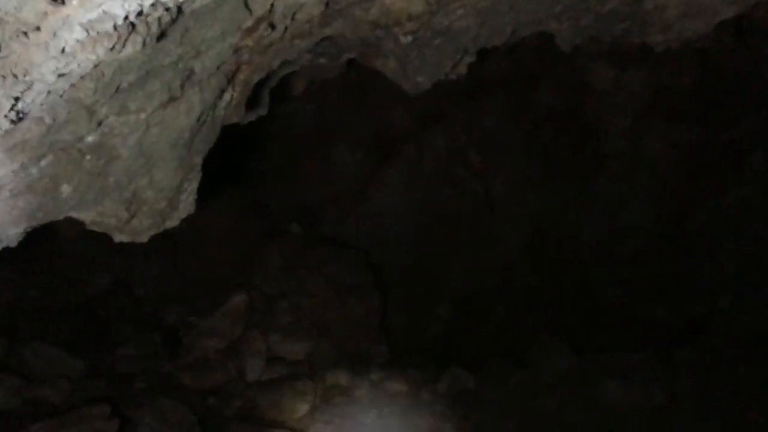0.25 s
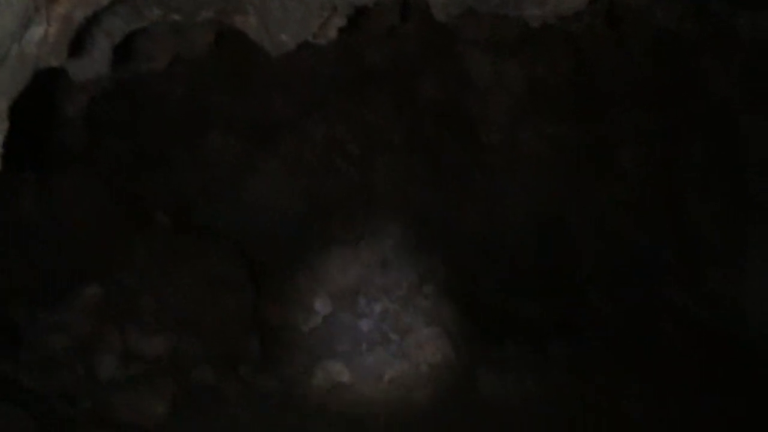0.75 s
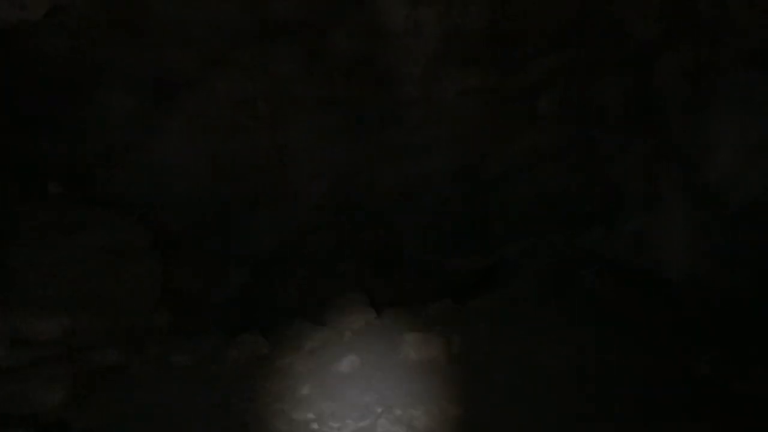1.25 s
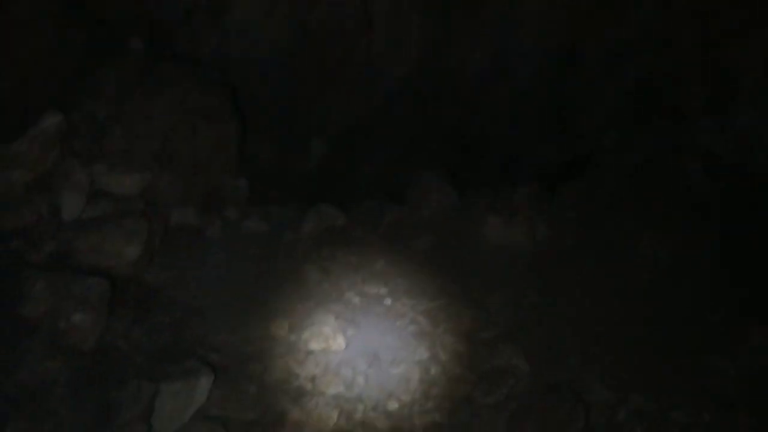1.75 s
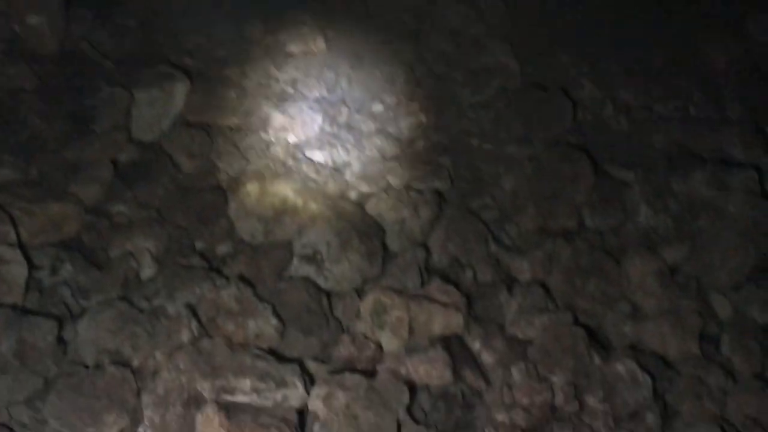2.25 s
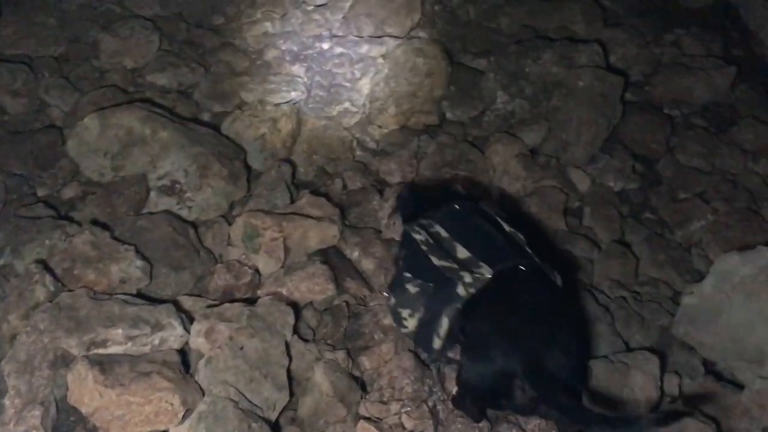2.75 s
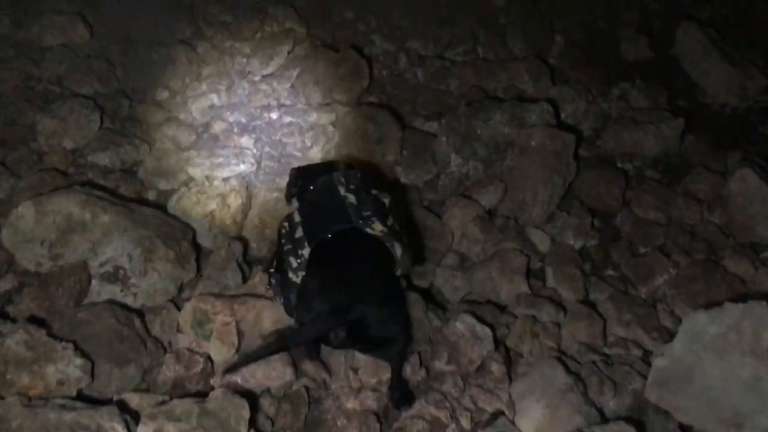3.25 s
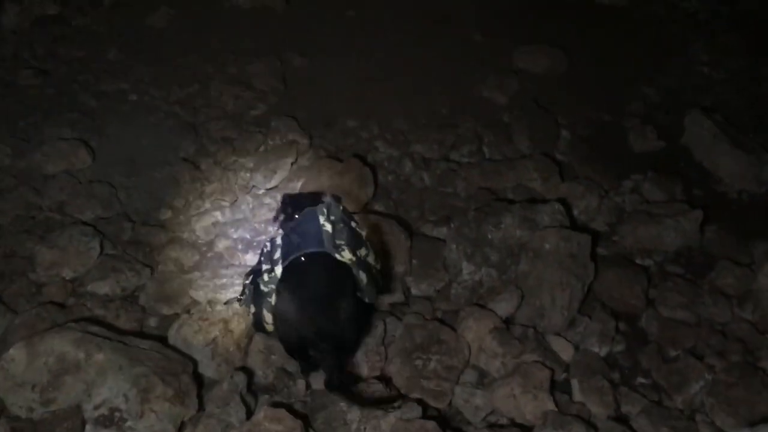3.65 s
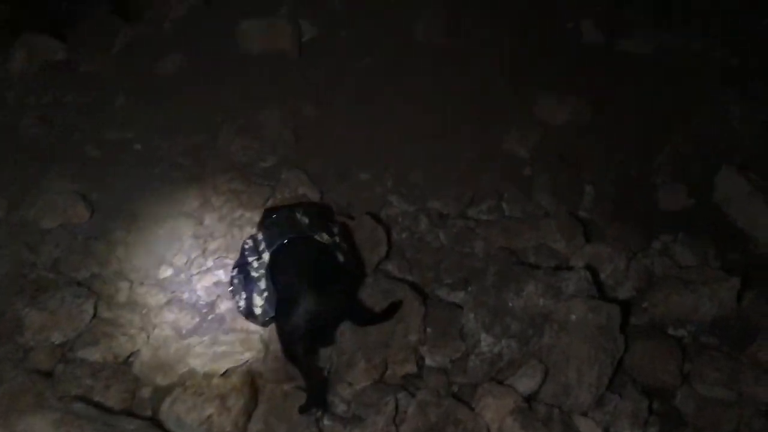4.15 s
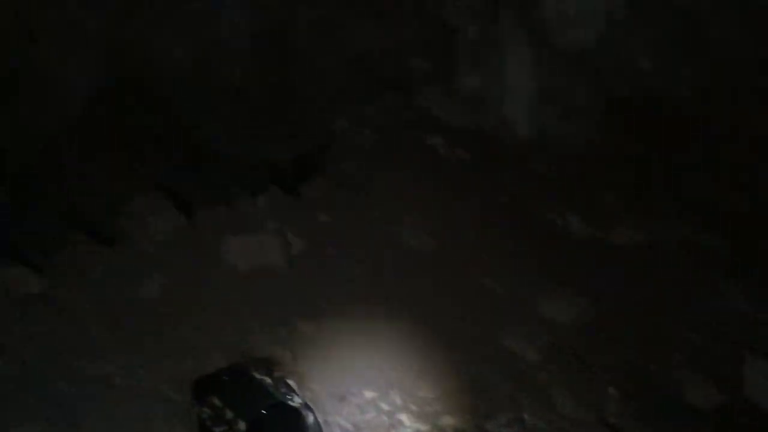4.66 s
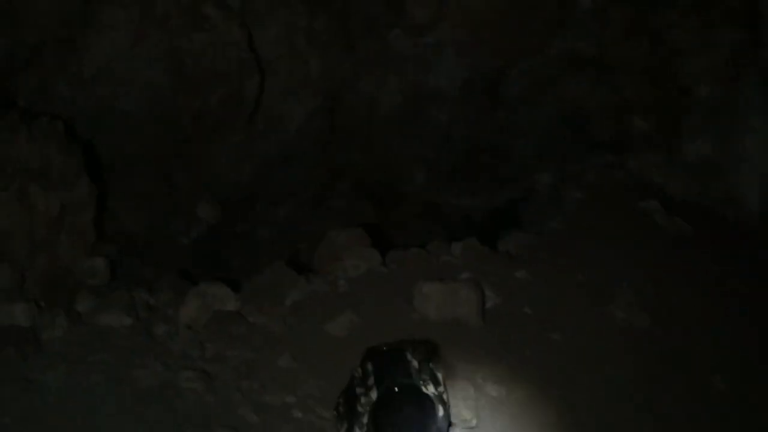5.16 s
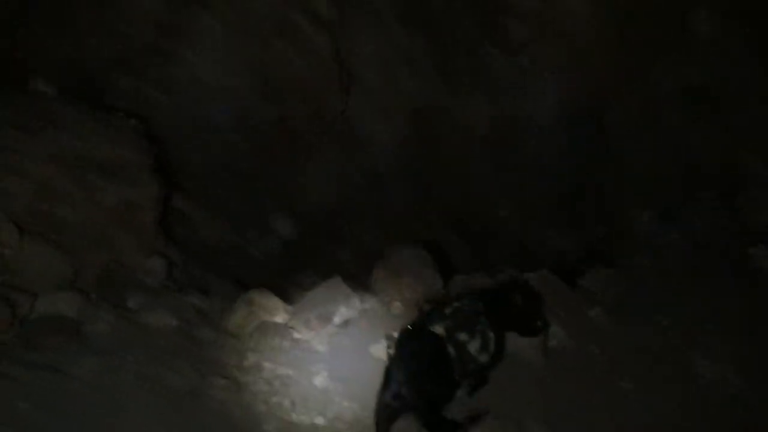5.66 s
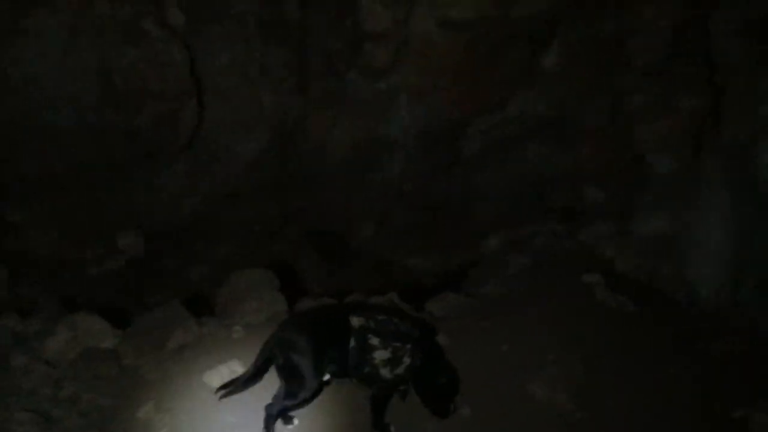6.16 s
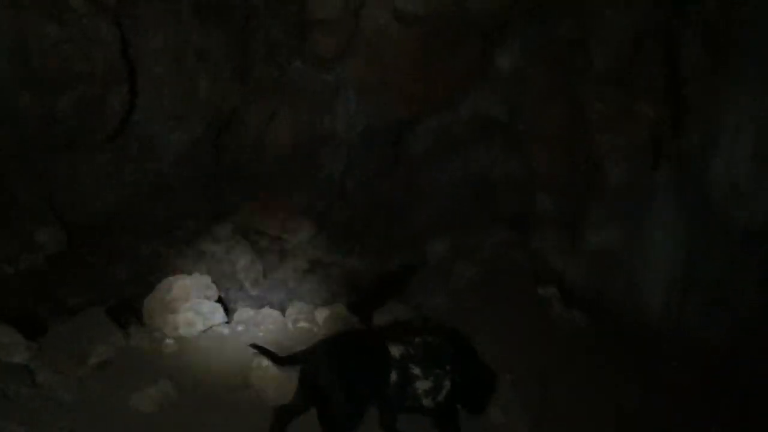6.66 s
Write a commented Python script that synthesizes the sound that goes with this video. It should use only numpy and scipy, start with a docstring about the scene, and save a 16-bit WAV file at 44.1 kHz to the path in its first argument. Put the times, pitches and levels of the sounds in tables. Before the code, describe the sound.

In a small rock-walled cave, faint clicks and knocks give way to pebbles clicking over grinding soles. A flat slab lands and rocks, then bright stone clicks crowd together sharply. A hard press grinds loudly, after which the steps thin to scattered clicks with a few clusters. Short dense echo, low rumble and steady microphone hiss surround the close sounds.

```python
"""Boots and a dog's paws cross loose rubble in a small cave.
0-1 s: faint clicks and knocks. 1-2 s: pebbles click over grinding soles. 2-2.9 s: dense bright clicks; a slab lands.
3.1-3.3 s: a hard press grinds loudly. Then sparser clicks, with clusters near 5.4 and 6.1 s.
Stones are struck modes, presses are grainy noise; here and there brief thin high tones, as fading sines.
Throughout: short dense wall echo as decaying noise, low rumble and microphone hiss as banded noise."""
import sys
import numpy as np
from scipy import signal
from scipy.io import wavfile

SR = 44100
rng = np.random.default_rng(int(sys.argv[2]) if len(sys.argv) > 2 else 0)


def file_out(sig):
    """Save sig as 16-bit WAV at sys.argv[1]."""
    # one column per channel
    cols = np.atleast_2d(sig).T
    # limit, then scale
    lim = np.clip(cols, -1, 1)
    pcm = np.round(lim * 32767).astype(np.int16)
    wavfile.write(sys.argv[1], SR, pcm)


N = 304731


def amp(db):
    """dB to amplitude."""
    return 10 ** (np.asarray(db) / 20)


def rms_one(x):
    """Scale to rms 1."""
    return x / np.sqrt(np.mean(x ** 2) + 1e-20)


def at_hz(points, hz):
    """Read a frequency table, linear in log f."""
    f_hz, value = np.array(points).T
    return np.interp(np.log(hz), np.log(f_hz), value)


def add(out, s, sound):
    """Mix a sound in at time s, cut at the end."""
    at = round(s * SR)
    out[at:at + len(sound)] += sound[:N - at]


def resonance(x, hz, width_hz):
    """Two-pole resonance, gain 1 on top; centre held to 17 kHz."""
    r = np.exp(-np.pi * width_hz / SR)
    w = 2 * np.pi * min(hz, 17000) / SR
    return signal.lfilter(np.array([1, 0, -1]) * (1 - r * r) / 2, [1, -2 * r * np.cos(w), r * r], x)


def rattle(length_ms, samples, per_s):
    """A first contact, then a dying cluster of chance ones; long rattles start softer, as a scuff."""
    happens, force = rng.random((2, samples))
    ms = 1000 * np.arange(samples) / SR
    touches = (happens < per_s / SR) * (2 * force - 1) * np.exp(-ms / max(length_ms, .2))
    touches[0] = 0.61 * np.exp(-length_ms / 8.9)
    return touches + 1e-12


# modes of an uneven stone, before chance: place [breadths from centre], level/dB
MODES = [(-1.73, -5), (-1.43, -2), (-0.86, 4.5), (-0.32, 11.5), (0.28, 6.5), (0.71, 3.5), (0.87, 1),
         (0.79, -6), (1.6, -34)]


def strikes(rows):
    """Each rattle rings the short modes of a stone, spread about its centre, each a little off by chance."""
    out = np.zeros(N)
    for s, peak_db, hz, breadth_octaves, length_ms in rows:
        touches = rattle(length_ms, 4500, per_s=2500)
        ring = 0
        for place, mode_db in MODES:
            place_luck, level_luck = rng.normal(size=2)
            mode_hz = hz * 2 ** (breadth_octaves * (place + 0.16 * place_luck))
            mode = resonance(touches, mode_hz, mode_hz / 4.3)
            # low modes have narrower bands: more drive for the same energy
            ring = ring + amp(mode_db + 2.2 * level_luck) * np.sqrt(hz / mode_hz) * mode
        # contact time dulls everything above the top modes
        top_hz = min(hz * 2 ** (1.85 * breadth_octaves), 18000)
        ring = signal.sosfilt(signal.butter(2, top_hz, fs=SR, output="sos"), ring)
        add(out, s, amp(peak_db) * ring / np.max(np.abs(ring)))
    return out


PEBBLE_OVER_GRIT_DB, PEBBLE_SPREAD_DB = 15.5, 3
PEBBLE_HZ, PEBBLE_SPREAD_OCTAVES, PEBBLE_MS = 4080, 1, 3.1   # medians and pitch spread


def pebbles(grit_db, count):
    """Small stones kicked loose: strikes at random, thicker and louder where the grit is loud."""
    share = np.cumsum(np.sqrt(amp(grit_db)))
    at = np.searchsorted(share / share[-1], rng.random(count))
    rows = []
    for i, (level, pitch, length) in zip(at, rng.normal(size=(count, 3))):
        peak_db = grit_db[i] + PEBBLE_OVER_GRIT_DB + PEBBLE_SPREAD_DB * level
        hz = PEBBLE_HZ * 2 ** (PEBBLE_SPREAD_OCTAVES * np.clip(pitch, -2, 2))
        rows.append((i / SR, peak_db, hz, PEBBLE_MS * 2 ** length))
    return rows


# weight dropping onto packed rock: t/s, peak level/dB, rattle length/ms
THUMPS = [(.815, -29, 17), (1.141, -45, 20), (1.39, -35.5, 15), (1.416, -43, 22), (2.106, -14, 4.4),
          (2.552, -29.5, 36), (3.255, -25, 16), (3.299, -30, 22), (3.368, -27, 16), (3.677, -32, 11),
          (3.81, -34.5, 11), (3.944, -29.5, 15), (5.219, -41, 5), (5.261, -39, 13), (5.395, -24.5, 28),
          (5.424, -25.5, 12), (6.135, -31.5, 9.2), (6.19, -35, 11), (6.315, -25.5, 14), (6.698, -38.5, 14)]
THUMP_HZ, THUMP_OCTAVES = 199, 0.49


def thumps():
    """Weight drops onto packed rock: strikes on low modes of fixed centre and breadth."""
    return [(s, db, THUMP_HZ, THUMP_OCTAVES, ms) for s, db, ms in THUMPS]


# stone on stone, pebbles high, big rocks low: t/s, peak level/dB, centre f/Hz, rattle length/ms
STRIKES = [(0.077, -38, 3000, 2.3), (0.233, -40.5, 1060, 11), (0.2428, -29, 8800, .7),
           (.794, -37.5, 804, 7.5), (.815, -27, 650, 4.9), (.816, -34.5, 3800, 18), (1.0313, -36, 1100, 23),
           (1.1398, -13.5, 2670, 1.44), (1.1456, -21, 2910, 4.1), (1.1613, -24, 3660, 3.8),
           (1.2132, -24.5, 3850, 3), (1.3888, -28.5, 3640, 2.9), (1.4075, -28.5, 764, 9.5),
           (1.4821, -26, 7090, 2.3), (1.549, -24, 6430, 1.5), (1.5549, -16, 3870, 0.51),
           (1.557, -21, 4040, 14), (1.5683, -16, 3320, 0.9), (1.7236, -33, 5010, 2.6),
           (1.7728, -29, 11090, 3.7), (1.7796, -28, 5400, 29), (1.8506, -26, 2980, 3.2),
           (1.892, -21.5, 5460, 0.88), (1.8921, -32.5, 1340, 18), (1.9162, -27.5, 1690, 5.3),
           (1.9998, -25, 2250, 12), (1.999, -20.5, 6000, 1.7), (2.0526, -29, 5850, 2.3),
           (2.0664, -19.5, 8700, 4.8), (2.077, -14, 13390, 3.2), (2.1084, -26, 2500, 4.9),
           (2.1127, -18.5, 6700, 4.2), (2.1621, -17, 1250, 5), (2.197, -19.5, 3760, 3.2),
           (2.2275, -17.5, 7260, 2.2), (2.2504, -25, 4870, 1.7), (2.2908, -29, 1300, 9.5),
           (2.3362, -24, 1180, 3.8), (2.341, -19.5, 4580, 11), (2.3595, -10, 7500, 0.67),
           (2.38, -14, 6560, 3), (2.4046, -22.5, 2200, 1), (2.407, -10.5, 9720, 2.7),
           (2.414, -10, 7600, 3.3), (2.4174, -5.5, 6570, 2.5), (2.437, -9.5, 8300, .5),
           (2.453, -27, 4420, 3.6), (2.4689, -36, 700, 10.6), (2.4913, -15.5, 7000, 0.46),
           (2.542, -2.5, 5900, 2), (2.552, -27, 556, 8.8), (2.552, -5.5, 1350, 2.7),
           (2.5547, -25, 2520, 4.2), (2.573, -18.5, 1460, 17), (2.5953, -19, 3520, 1.6),
           (2.6645, -22.5, 4160, 5.5), (2.7043, -10, 9320, 0.57), (2.7145, -23, 1910, 1.8),
           (2.7409, 3.5, 6460, 0.64), (2.773, -24, 8060, 1), (2.787, -14.5, 3840, 0.89),
           (2.7926, -17.5, 8240, .8), (2.8108, -23, 5910, .5), (2.8283, -6.5, 7300, 0.65),
           (2.8407, -11, 4860, 2), (2.8507, -15, 5240, 0.69), (2.856, -19, 11000, .6),
           (2.89, -29, 1430, 20), (2.906, -20.5, 3730, 1), (2.9435, -6.5, 10700, 0.34),
           (3.0157, -22.5, 6160, 23), (3.098, -20, 6700, 9.6), (3.1385, -33.5, 1410, 20),
           (3.1639, -22.5, 1030, 13), (3.1937, -25, 7260, 0.77), (3.228, -12, 7900, 8),
           (3.2527, -12.5, 6140, 5.9), (3.253, -13, 1000, 8.2), (3.2637, -10.5, 1010, 4.5),
           (3.285, -23, 690, 39), (3.2956, -29, 4740, 10.3), (3.32, -24, 600, 18), (3.327, -26, 3300, 13),
           (3.357, -29, 4650, 3.8), (3.3674, -15.5, 3760, 1.4), (3.3673, -24, 1060, 19),
           (3.4712, -32.5, 870, 29), (3.5438, -29, 5430, 2.6), (3.5832, -27, 7600, 8),
           (3.6766, -36, 855, 15), (3.68, -18, 3650, 0.37), (3.7228, -20.5, 5530, 28),
           (3.7465, -31.5, 2240, 14), (3.8105, -40, 700, 4.4), (3.938, -24.5, 4700, 2.8),
           (3.9487, -26, 4230, 11), (3.95, -31, 403, 14), (3.9553, -27.5, 1140, 8.1),
           (4.1847, -35, 2500, 3), (4.2014, -34, 8430, 1.6), (4.226, -30.5, 3010, 4),
           (4.25, -36.5, 2200, 8), (4.324, -26.5, 5970, 0.51), (4.512, -35.5, 1500, 3.3),
           (4.529, -30.5, 3400, 1.3), (4.6365, -29, 5130, 12), (4.653, -37.5, 500, 6.9),
           (4.701, -39, 1420, 4), (4.739, -35.5, 10160, 4.1), (4.859, -35.5, 1040, 5.3),
           (4.9002, -28, 2040, 1.8), (4.958, -26.5, 8100, 2.9), (5.0377, -34.5, 4190, 4.9),
           (5.1206, -26.5, 1640, 2), (5.125, -33.5, 1500, 22), (5.2602, -35, 6330, 2.7),
           (5.2922, -5.5, 7900, 1.5), (5.391, -25, 8500, 2.9), (5.393, -21.5, 1190, 12),
           (5.3957, -16.5, 3040, 12), (5.405, -12, 2030, 7.5), (5.413, -12.5, 3040, 6.1),
           (5.42, -11.5, 2270, 12), (5.4246, -9, 3060, 11), (5.44, -32, 1530, 13), (5.513, -25, 3520, 4.5),
           (5.5235, -22.5, 5160, 3.9), (5.5383, -16, 7800, 4.7), (5.673, -28.5, 3780, 1.3),
           (5.7102, -31, 3410, 1), (5.7377, -30, 5100, 1.7), (5.8336, -36, 5270, 6.5),
           (5.9585, -33, 2830, 3), (5.9856, -29, 2830, 0.74), (6.1285, -18, 3620, 25),
           (6.1335, -10.5, 3220, 4.2), (6.139, -32.5, 350, 6.6), (6.151, -32, 3000, 14),
           (6.2066, -29.5, 1200, 16), (6.2127, -26.5, 4210, 2), (6.3121, -19.5, 2780, 1.5),
           (6.3145, -21, 754, 12), (6.3215, -23, 1190, 3), (6.354, -30, 4530, .9), (6.3798, -29.5, 730, 36),
           (6.4146, -21.5, 990, 1.4), (6.511, -35, 7000, 1.1), (6.536, -34.5, 725, 18)]
BREADTH_OCTAVES, BREADTH_OCTAVES_PER_DECADE = 0.54, 0.14   # at 1 ms and 2700 Hz; per decade of length
NARROWER_OCTAVES_PER_OCTAVE = 0.078   # higher stones have their modes closer together


def stones(grit_db):
    """Strikes and loose pebbles, broader for long rattles and low stones, and the low thumps."""
    rows = []
    for s, db, hz, ms in STRIKES + pebbles(grit_db, count=55):
        breadth = BREADTH_OCTAVES + BREADTH_OCTAVES_PER_DECADE * np.log10(ms)
        breadth -= NARROWER_OCTAVES_PER_OCTAVE * np.log2(hz / 2700.0)
        rows.append((s, db, hz, max(breadth, .1), ms))
    return strikes(rows + thumps())


# modes of a flat rock: f/Hz, width/Hz, level before width and tilt/dB
SLAB_MODES = [(230, 140, -1.5), (412, 73, 3), (630, 88, 1.5), (1040, 18, -16), (1380, 78, -5),
              (1567, 50, 7.5), (1780, 30, -7), (1960, 38, -24)]
# it lands, rocks and bounces: t/s, peak level/dB, rattle length/ms, tilt/(dB per octave about 700 Hz)
SLAB_HITS = [(2.107, -5.5, 5.7, 0), (2.131, -20.5, 27, -13), (2.159, -21, 3, -9)]


def slab():
    """One flat rock rings longer, on modes of its own."""
    out = np.zeros(N)
    for s, peak_db, length_ms, tilt_db in SLAB_HITS:
        touches = rattle(length_ms, 9000, per_s=1500)
        ring = 0
        for hz, width_hz, mode_db in SLAB_MODES:
            gain = amp(mode_db + tilt_db * np.log2(hz / 700)) / np.sqrt(width_hz)
            ring = ring + gain * resonance(touches, hz, width_hz)
        add(out, s, amp(peak_db) * ring / np.max(np.abs(ring)))
    return out


# brief thin high tones, and a soft low tone: t/s, fade length/s, f/Hz, level/dB
TONES = [(0.313, 0.026, 13100, -50), (1.386, .03, 13200, -52), (1.763, 0.023, 13800, -46),
         (1.92, .03, 14000, -44), (2.077, .02, 14200, -48), (2.688, .02, 14000, -47),
         (3.443, .025, 14000, -54), (3.96, .03, 13900, -48), (5.68, .05, 671, -55),
         (5.737, 0.016, 668, -45), (6.37, 0.035, 11300, -46.5)]


def thin_tones():
    """Near sines that start fast and fade."""
    out = np.zeros(N)
    for s, length_s, hz, db in TONES:
        t = np.arange(round(2 * length_s * SR)) / SR
        envelope = np.minimum(t / 0.0024, 1) * np.exp(-(t / length_s) ** 3)
        add(out, s, amp(db) * envelope * np.sin(2 * np.pi * hz * t))
    return out


# boot or paw presses: t/s, hold/s, then level/dB of grinding, fine grit, thud, ground rumble
STEPS = [(0, .02, -57, -52, -57, -49.5), (0.163, .05, -57, -58, -59.5, -59),
         (0.234, 0.16, -56, -59, -55.5, -55), (0.611, 0.036, -65, -59, -68.5, -50),
         (0.819, .03, -52, -52, -49, -35), (0.909, .12, -45.5, -51, -46.5, -42.5),
         (1.118, .09, -44.5, -45, -52, -49), (1.41, .08, -46, -45, -48.5, -39.5),
         (1.479, 0.042, -47.5, -45, -52.5, -47), (1.57, .05, -47, -41, -50.5, -47),
         (1.7, .05, -46.5, -46, -53, -49), (1.889, .05, -55.5, -41.5, -57, -52),
         (2.054, .08, -48, -43.5, -47.5, -56), (2.221, .12, -43, -43.5, -53.5, -48),
         (2.399, .1, -47.5, -45, -65, -49), (2.56, .02, -33, -48, -49, -52),
         (2.695, .05, -59, -42, -52.5, -49), (2.861, .05, -47, -48, -53, -47.5),
         (3.03, .05, -60, -54, -64, -53), (3.112, 0.049, -49, -46, -51, -42),
         (3.257, .02, -32, -32.5, -48, -31), (3.351, .1, -61, -45.5, -56, -41),
         (3.53, .1, -53, -52, -55, -53.5), (3.761, .04, -60, -44, -57, -43),
         (3.941, .05, -49.5, -51.5, -44, -41.5), (4.08, .04, -56, -54, -53, -53),
         (4.238, .02, -56, -52, -68, -60), (4.348, .02, -60, -53.5, -71, -50),
         (4.515, .02, -67, -55, -59, -50), (4.601, .12, -60, -51.5, -59.5, -45.5),
         (4.844, .06, -66, -52, -55.5, -46.5), (5.035, .03, -64, -54, -66, -58),
         (5.141, .08, -58.5, -57, -57.5, -56), (5.276, .02, -58, -47, -58, -46),
         (5.415, .03, -50, -38, -55, -32), (5.304, 0.019, -62, -46, -62, -53),
         (5.53, .035, -61, -44, -51.5, -44.5), (5.678, .06, -66, -57, -66, -59),
         (5.941, .03, -58.5, -60, -59, -60), (6.144, .04, -51, -53, -46.5, -46),
         (6.308, .03, -40.5, -48.5, -52, -52), (6.407, .03, -63, -53, -48, -47),
         (6.544, .04, -50.5, -50, -49, -48), (6.695, .03, -63.5, -54.5, -52.5, -44)]
# swell into a press [dB/s]: grinding, grit, thud, rumble
RISE_DB_PER_S = [384, 303.4, 350, 347]
# fall after a press [dB/s]: same order
FALL_DB_PER_S = [133, 90.3, 131, 147]
# floor between presses, level/dB: same order
REST_DB = [-60.5, -59, -65, -59.5]


def pressing():
    """Levels in dB of grinding, grit, thud and rumble: each press swells, holds and dies; powers add."""
    t = np.arange(0, N, 64) / SR
    power = amp(REST_DB)[:, None] ** 2
    for s, hold_s, *db in STEPS:
        before_db = np.outer(RISE_DB_PER_S, np.maximum(s - t, 0))
        after_db = np.outer(FALL_DB_PER_S, np.maximum(t - s - hold_s, 0))
        power = power + amp(np.array(db)[:, None] - before_db - after_db) ** 2
    return [np.interp(np.arange(N) / SR, t, 10 * np.log10(p)) for p in power]


def drift(rate_hz):
    """Slow chance of rms 1: noise through two equal poles at rate_hz, drawn every 40 samples."""
    r = np.exp(-80 * np.pi * rate_hz / SR)
    noise = rng.standard_normal(N // 40 + 2002)
    slow = signal.lfilter([1], [1, -2 * r, r * r], noise)[2000:]   # skip the settling
    return np.interp(np.arange(N) / 40, np.arange(len(slow)), rms_one(slow))


def grains(spectrum, per_s, spread_db, smooth, patchy_db):
    """Random contacts over smooth friction noise, in half-octave bands that flicker on their own; rms 1."""
    out, edges_hz = 0, 22 * 2 ** np.arange(0, 10, .5)
    born = rng.random(N) < per_s * amp(3.5 * drift(25)) / SR   # contacts clump
    force = np.minimum(rng.exponential(1, N), 4)
    for low, high in zip(edges_hz, edges_hz[1:]):
        gain_db = at_hz(spectrum, np.sqrt(low * high))
        if gain_db > -45:
            # a contact has its own strength in each band
            sizes = amp(spread_db * force) * rng.standard_normal(N)
            drive = rms_one(born * sizes) + smooth * rng.standard_normal(N)
            sos = signal.butter(2, [low, high], "band", fs=SR, output="sos")
            band = signal.sosfilt(sos, rms_one(drive))
            out = out + amp(gain_db + patchy_db * drift(10.5)) * band
    return rms_one(out)


# grinding spectrum: f/Hz, relative level/(dB per Hz)
GRIND = [(120, -27), (200, 3.5), (366, -3.5), (727, -9.5), (983, -8.5), (1540, -5), (2730, -2), (4540, -16),
         (9000, -18.5), (11700, -38), (19800, -120)]


def grinding(level_db):
    """Stones grind under the soles: contacts over friction noise."""
    return amp(level_db) * grains(GRIND, per_s=300, spread_db=3.5, smooth=1.0, patchy_db=-1.2)


# fine grit spectrum: f/Hz, relative level/(dB per Hz)
GRIT = [(1500, 1.5), (3000, -3.5), (4000, 8), (6500, -1.5), (9000, 0.5), (12000, -8), (16000, -8)]


def fine_grit(level_db):
    """Fine grit under the soles: denser, brighter contacts."""
    return amp(level_db) * grains(GRIT, per_s=900, spread_db=3.0, smooth=1.0, patchy_db=1.5)


# thud spectrum: f/Hz, relative level/(dB per Hz)
THUD = [(70, -27), (120, 3), (200, -4), (300, -14.5), (500, -44)]


def thuds(level_db):
    """Low thud of each press: sparse contacts of uneven force over low noise."""
    return amp(level_db) * grains(THUD, per_s=98, spread_db=5.0, smooth=1.6, patchy_db=4.0)


# ground rumble spectrum: f/Hz, relative level/(dB per Hz)
RUMBLE = [(25, -51), (40, -15.5), (60, 12.5), (90, -4), (150, -11.5), (250, -55)]


def ground_rumble(level_db):
    """Ground rumble that swells with each press: sparse contacts over the lowest noise."""
    return amp(level_db) * grains(RUMBLE, per_s=65, spread_db=0.0, smooth=1.35, patchy_db=3.0)


# echo decay: f/Hz, T60/s
CAVE_T60 = [(100, 0.59), (1000, 0.33), (5000, 0.36), (15000, 0.2)]


def cave(x):
    """Dense echoes from rough walls: noise dying band by band, with a build-up of 0.87 ms time constant."""
    t, echo = np.arange(SR // 2) / SR, 0
    for low in 60 * 2 ** np.arange(8):
        sos = signal.butter(2, [low, 2 * low], "band", fs=SR, output="sos")
        band = signal.sosfilt(sos, rng.standard_normal(len(t)))
        echo = echo + band * amp(-60 * t / at_hz(CAVE_T60, low * np.sqrt(2)))
    echo *= 1 - np.exp(-t / 0.00087)
    return signal.fftconvolve(x, echo / np.sqrt(np.sum(echo ** 2)))[:N]


# hiss spectrum: f/Hz, relative level/(dB per Hz)
HISS = [(150, -26), (250, -8), (476, -1.5), (2320, -1.5), (4050, -5.5), (4900, -8), (9010, 5), (10400, -17),
        (13400, -4.5), (16000, -22)]
HISS_DB = -60


def microphone_hiss():
    """Steady-level hiss: mostly smooth noise, its bands flickering."""
    return amp(HISS_DB) * grains(HISS, per_s=2000, spread_db=-1.5, smooth=7.2, patchy_db=3.8)


CAVE_DB = -12


def scene():
    """Stones, thin tones, grinding and grit feed the cave; thud, rumble and hiss stay dry."""
    grind_db, grit_db, thud_db, rumble_db = pressing()
    near = stones(grit_db) + slab() + thin_tones() + grinding(grind_db) + fine_grit(grit_db)
    background = thuds(thud_db) + ground_rumble(rumble_db) + microphone_hiss()
    return (near + amp(CAVE_DB) * cave(near) + background)[None]


# dips from the microphone housing: f/Hz, width/Hz, share taken out [0-1]
MIC_DIPS = [(4860, 1200, 0.48), (10410, 430, 0.96)]
BASS_CUT_HZ, TOP_CUT_HZ = 39, 16400


def record(dry):
    """A bass cut, two dips from the microphone housing, clipped peaks, the top cut."""
    dry = signal.sosfilt(signal.butter(2, BASS_CUT_HZ, "high", fs=SR, output="sos"), dry)
    for hz, width_hz, share in MIC_DIPS:
        dry = dry - np.clip(share, 0, 1) * resonance(dry, hz, width_hz)
    clipped = np.clip(dry, -.9, .9)
    return signal.sosfilt(signal.cheby2(18, 85, TOP_CUT_HZ, fs=SR, output="sos"), clipped)


dry = scene()
out = record(dry)
file_out(out)
```